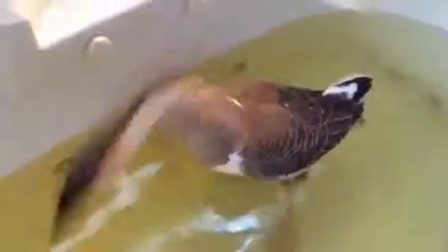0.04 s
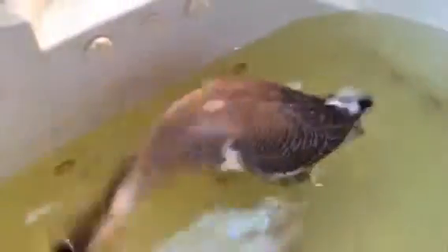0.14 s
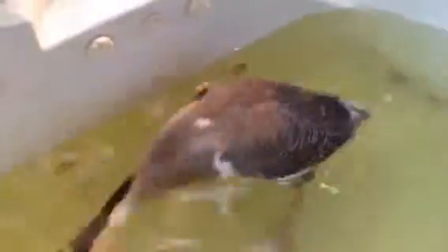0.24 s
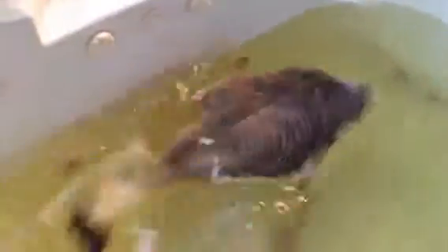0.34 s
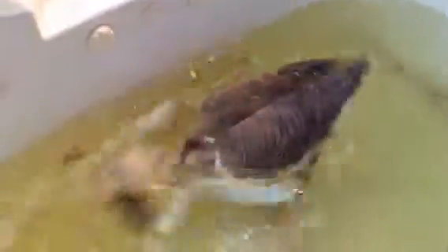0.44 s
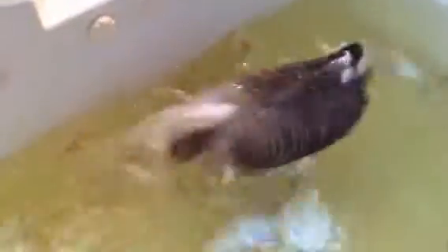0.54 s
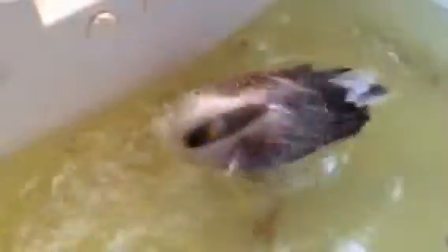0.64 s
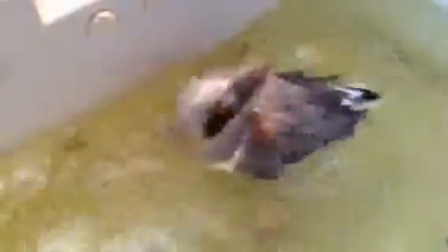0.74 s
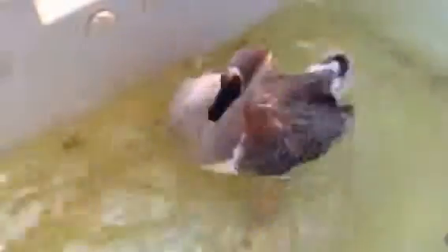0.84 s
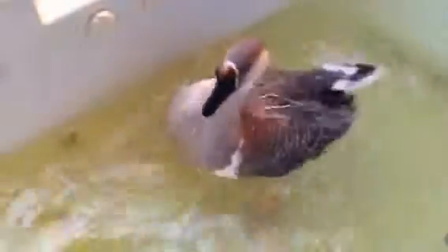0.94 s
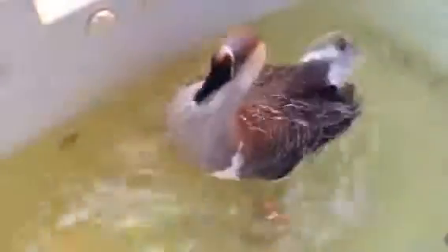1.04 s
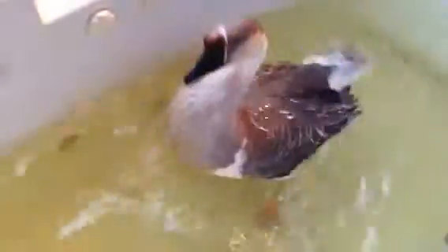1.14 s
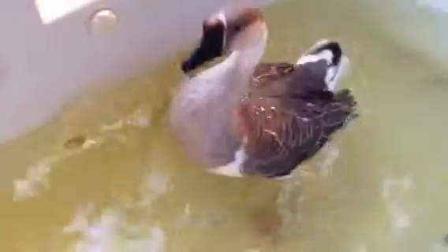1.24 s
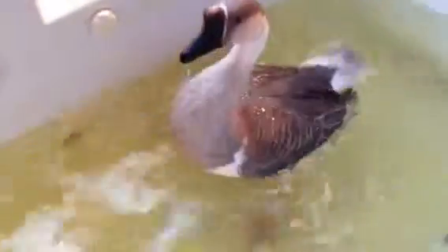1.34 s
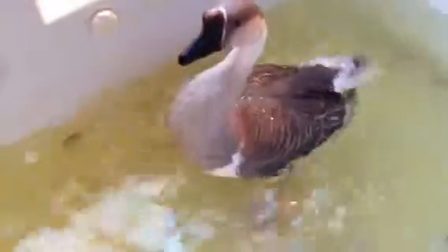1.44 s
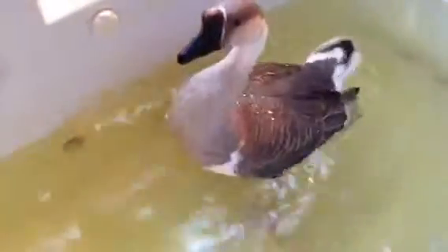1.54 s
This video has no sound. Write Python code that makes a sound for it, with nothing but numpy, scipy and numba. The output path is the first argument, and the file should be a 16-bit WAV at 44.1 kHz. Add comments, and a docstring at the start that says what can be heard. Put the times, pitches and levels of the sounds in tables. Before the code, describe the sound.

A bathing goose splashes water in a tub, with bubbly plops and light dripping afterwards.

```python
"""A sharp splash and a deep plop: a goose ducks its head in a bathtub, throws water over its back
and comes up dripping. Each splash is a cloud of ringing air bubbles, with deep churning below and
fine spray above. Sheets of water slap, big single bubbles plop, drops fall back and the feathers
trickle. The tub hums at its hollow note and the bathroom rings with it all, over a faint hush."""
import sys
import numpy as np
from scipy import signal
from scipy.fft import rfft, irfft, next_fast_len
from scipy.io import wavfile
from numba import njit

SR = 44100
rng = np.random.default_rng(int(sys.argv[2]) if len(sys.argv) > 2 else 0)


def transcribe(u):
    """Save the signal u as a 16-bit wav file named by the first command-line argument.

    u: samples, shape (n,) or (channels, n), limited to [-1, 1]; the rate is SR.
    q: integer samples, one column per channel.
    """
    v = np.clip(np.atleast_2d(u).T, -1, 1)
    q = np.round(v * 32767).astype(np.int16)
    wavfile.write(sys.argv[1], SR, q)


N = 70560

# splashes: peak t/s, rise/s, fall/s, froth f/Hz, churn level/dB, froth level/dB, spray level/dB
SPLASHES = [ (0.1908, 0.0029, 0.0077, 2096, -38.5, -35, -47), (.228, 0.012, 0.056, 1670, -49, -47, -56),
            (0.261, 0.00077, 0.011, 2550, -41, -47.5, -50), (0.301, 0.00093, 0.016, 4900, -82, -43.5, -48),
            (.368, 0.011, .015, 2380, -98, -44.5, -48.5), (0.39, 0.0068, 0.036, 2954, -52, -36, -43),
            (.450, 0.016, 0.013, 1618, -58, -37, -67), (0.5, 0.01, 0.019, 2380, -55, -35.5, -47.5),
            (.541, 0.01, 0.023, 2380, -41, -30.5, -42), (.568, .012, .040, 2006, -37, -31, -43.5),
            (.621, .011, .014, 2785, -37.5, -27, -38), (.665, 0.02, 0.086, 2046, -50.5, -33, -45),
            (0.774, .025, 0.054, 2258, -51.5, -34.5, -44), (.789, 0.0051, 0.01, 975, -52, -41, -60),
            (.815, 0.0055, 0.085, 2874, -63, -39, -46), (0.898, 0.016, 0.019, 2770, -52.5, -37.5, -56),
            (.955, .016, 0.026, 2044, -63, -37.5, -52), (1.012, .010, 0.034, 2430, -64, -49, -46),
            (1.155, 0.025, 0.027, 4030, -64, -66, -54.5), ]
# slaps of water: t/s, centre f/Hz, burst level/dB, resonance Q
SLAPS = [ (.1865, 11100, -33.5, 1.7), (.260, 10000, -32, 1.4), (0.2966, 4850, -20.5, 2.8),
         (.5635, 4330, -20, 3), (.589, 12500, -19.5, 2.8), (0.606, 8850, -19.5, 1.6),
         (.6235, 8600, -15.5, 1.9), (.802, 4750, -31, 4.6), (0.8055, 12500, -23.5, 4.7),
         (0.85, 8260, -19.5, 7), ]
# big single bubbles: t/s, f/Hz, level/dB, decay/s, glide/(octaves per s)
PLOPS = [ (.2055, 495, -19, 0.0035, -13), (.1905, 1140, -28, 0.0033, 1.5), (.2062, 908, -25, 0.0031, -5),
         (.2910, 3200, -35, 0.0016, 19), (.380, 524, -37.5, 0.02, 3), (.380, 1150, -39, 0.022, 2),
         (.3885, 3200, -20, 0.00093, 11), (.3890, 3840, -21, 0.0014, 24), (.428, 664.5, -39, 0.029, 7),
         (.477, 960, -31, 0.0082, 23), (.533, 3180, -26.5, 0.0041, 2.5), (.536, 1972, -28, 0.0096, 8),
         (.551, 2550, -27, 0.011, 4.5), (.603, 950, -13.5, 0.0022, 32), (.6115, 3530, -17.5, 0.00095, 4),
         (.676, 1525, -22, 0.0041, 11.5), (.755, 1500, -26.5, 0.0049, 1.5), (.782, 608, -29, 0.0064, 6),
         (.783, 1503, -28.5, 0.0056, 2), (.786, 2670, -26.5, 0.0035, 9.5), (.792, 737, -26, 0.011, 5.5),
         (.796, 1426, -20, 0.0031, 1), (.785, 928, -27, 0.0083, 4), (.818, 3320, -26.5, 0.0014, 24),
         (.835, 1317, -30, 0.0069, 22), (.848, 780, -32.5, 0.0064, 7), (.878, 850, -31.5, 0.0043, 7),
         (.912, 873, -44, 0.054, .5), (.9335, 1257, -22.5, 0.0082, 3), (.935, 2536, -34.5, 0.0034, 7.5),
         (.947, 1420, -39, 0.0038, 9), (1.003, 1853, -34, 0.016, 1), (1.005, 996, -28, 0.0061, -2),
         (1.018, 922, -36, 0.01, 3.5), (1.075, 2415, -46.5, 0.021, 3.5), (1.186, 2100, -43.5, 0.012, 5.5),
         (1.2045, 2920, -39.5, 0.0025, 1), (1.301, 4920, -48, 0.0016, -3.5), (1.375, 2390, -58, 0.0048, 22),
         (1.389, 2830, -53, .003, 20), (1.4494, 4910, -30, 0.0012, 10), (1.538, 2820, -52.5, 0.0069, 4), ]
# drops that trap a bubble: t/s, bubble f/Hz, bubble level/dB, decay/s, impact level/dB
DROPS = [ (1.1465, 2210, -45.5, 0.0045, -50), (1.1775, 2058, -30, 0.0067, -22),
         (1.2045, 2270, -40, 0.0047, -24), (1.241, 1960, -44, 0.0027, -35.5),
         (1.4917, 1560, -38, 0.01, -29), (1.522, 3300, -44.5, 0.0025, -43), ]
# first echoes off the tub walls: typical delay/s, gain
WALL_ECHOES = [(.0016, 0.19), (.0037, 0.24), (.0062, 0.1)]
# tone of the bathroom's tail: f/Hz, level/dB
ROOM_EQ = [(80, -9), (270, -7.5), (600, -10.5), (1500, -6), (3000, -9.5), (5000, -6.5), (7500, -3),
           (15000, -9.5)]
# tone of the steady hush: f/Hz, relative level/dB
HUSH_EQ = [(18, -94), (30, -47), (119, -7), (228, -3.5), (260, -5.5), (296, -3.5), (837, -16.5),
           (978, -16.5), (1140, -9.5), (1520, -15), (15000, -17)]
# microphone colour: f/Hz, level/dB
MIC_EQ = [(40, -25), (110, 0.5), (300, -4), (1000, -3), (3000, 1.5), (6000, 0), (10000, -3.5),
          (14000, -3.5)]

# grain textures: rate/(grains per s), pitch spread/octaves, decay/cycles, level scatter/dB
CHURN = (1300, 0.519, 2.24, 2.2)
FROTH = (3900, 0.7215, 3.45, 5.6)
SPRAY = (5000, 0.73, 2, 5.3)
TRICKLE = (600, 0.528, 9.3, 6.6)
TICKS = (140, 0.32, 0.83, 2.2)

SPOTS = 6  # places on the water, each with its own echoes
CHURN_HZ, SPRAY_HZ, GRAIN_GLIDE_OCT = 479, 7760, 0.046  # glide per decay time
IMPACT_HZ, IMPACT_DECAY_S, IMPACT_ATTACK_S, IMPACT_LOW_CUT_HZ = 2920, 0.00035, 0.000092, 1580
ROOM_T60_S, TREBLE_T60_S, CROSSOVER_HZ, BUILD_S = .37, .28, 3700, 0.003
WASH_DB, WASH_T60_S, WALL_SPREAD_OCT = -6.5, 0.064, 0.36


def splashes():
    """Every splash churns big air pockets, froths with bubbles and scatters spray."""
    out = np.zeros((SPOTS, N))
    for peak, rise, fall, froth_hz, churn_db, froth_db, spray_db in SPLASHES:
        out += bubble_cloud(peak, rise, fall, CHURN_HZ, churn_db, CHURN)
        out += bubble_cloud(peak, rise, fall, froth_hz, froth_db, FROTH)
        out += bubble_cloud(peak, rise, fall, SPRAY_HZ, spray_db, SPRAY)
    return out


def bubble_cloud(peak, rise, fall, centre_hz, db, texture, max_grains=1800):
    """Bubble grains of many sizes, louder towards the peak time and fading after it."""
    rate, spread, cycles, scatter_db = texture
    lead = 2.5 * rise
    span = lead + 4.5 * fall
    count = int(np.clip(rate * span, 8, max_grains))
    jitter = rng.random(max_grains)[:count]
    t = (np.arange(count) + jitter) / count * span - lead
    pitch, strength = np.clip(rng.standard_normal((max_grains, 2))[:count], -2.4, 2.4).T
    hz = np.minimum(centre_hz * 2 ** (spread * pitch), SR * .42)
    decay = cycles / hz * 2 ** rng.uniform(-1, 1, max_grains)[:count]
    swell = np.where(t < 0, np.exp(-.5 * (t / rise) ** 2), np.exp(-np.abs(t) / fall))
    gain = swell * undb(scatter_db * strength) / np.sqrt(decay)
    grains = ring(peak + t, hz, gain, decay, GRAIN_GLIDE_OCT / decay, .5 / hz)
    return grains * undb(db) * np.sqrt((rise + fall / 2) * SR / np.sum(grains ** 2))


@njit
def ring(start, hz, gain, decay, glide, attack):
    """Trapped air rings: sines that swell, glide and die away, dealt out over the spots."""
    out = np.zeros((SPOTS, N))
    for k in range(len(start)):
        first = int(start[k] * SR) + 1
        for i in range(max(first, 0), min(N, first + int(7 * decay[k] * SR))):
            t = i / SR - start[k]
            phase = 2 * np.pi * hz[k] * t * (1 + np.log(2) * glide[k] * t / 2)
            envelope = np.exp(-t / decay[k]) * (1 - np.exp(-t / attack[k]))
            out[k % SPOTS, i] += gain[k] * envelope * np.sin(phase)
    return out


def slaps(decay_s=0.0014):
    """Sheets of water crack on the surface: snaps of noise through a bright resonance."""
    t = np.arange(N) / SR
    out = np.zeros((SPOTS, N))
    for k, (start, hz, db, q) in enumerate(SLAPS):
        burst = rng.standard_normal(N) * (t >= start) * np.exp(-np.abs(t - start) / decay_s)
        out[k % SPOTS] += undb(db) * signal.lfilter(*signal.iirpeak(hz, q, fs=SR), burst)
    return out


def plops(attack_share=0.28):
    """Single bubbles plop and plink above the splashing; the longer the ring, the softer the attack."""
    start, hz, db, decay, glide = columns(PLOPS)
    return ring(start, hz, undb(db) * (1 + attack_share), decay, glide, attack_share * decay)


def drops(attack_s=0.00091, glide_oct_per_s=1.2):
    """Water drips off the goose: a tick on the surface, then the trapped bubble rings."""
    start, hz, db, decay, impact_db = columns(DROPS)
    each = np.ones(len(start))
    tick = ring(start, IMPACT_HZ * each, undb(impact_db), IMPACT_DECAY_S * each,
                0 * each, IMPACT_ATTACK_S * each)
    bubble = ring(start, hz, undb(db), decay, glide_oct_per_s * each, attack_s * each)
    return pass_filter(tick, "high", IMPACT_LOW_CUT_HZ) + bubble


def runoff():
    """Water runs off the feathers in tiny bubbles and lone ticks."""
    trickle = bubble_cloud(peak=1.22, rise=0.57, fall=0.33, centre_hz=3001, db=-64, texture=TRICKLE)
    # the negative rise holds the ticks back until 1.35 s
    ticks = bubble_cloud(peak=.95, rise=-0.16, fall=0.54, centre_hz=8495, db=-65.5, texture=TICKS)
    return trickle + ticks


def tub(water, hz=266.5, q=27, gain=1.84):
    """The tub hums along at its hollow note."""
    return water + gain * signal.lfilter(*signal.iirpeak(hz, q, fs=SR), water)


def bathroom(spot):
    """Wall echoes and a short dense wash in the tub, then a room tail whose treble dies sooner."""
    t = np.arange(N) / SR
    noise = rng.standard_normal((3, N))
    fade = lambda t60: np.exp(-np.log(1000) * t / t60) * (1 - np.exp(-(t / BUILD_S) ** 2))
    unit_energy = lambda x: x / np.sqrt(np.sum(x ** 2))
    body = pass_filter(noise[0], "low", CROSSOVER_HZ) * fade(ROOM_T60_S)
    treble = pass_filter(noise[1], "high", CROSSOVER_HZ) * fade(TREBLE_T60_S)
    wash = undb(WASH_DB) * unit_energy(noise[2] * fade(WASH_T60_S))
    response = equalise(unit_energy(body + treble), ROOM_EQ) + wash
    for delay, gain in WALL_ECHOES:
        stretch = 2 ** (WALL_SPREAD_OCT * rng.uniform(-1, 1))  # wall distance differs by spot
        response[int(delay * stretch * SR)] += gain
    return spot + signal.fftconvolve(spot, response)[:N]


def hush(db=-65.5):
    """Faint, steady room tone."""
    noise = equalise(rng.standard_normal(N), HUSH_EQ)
    return noise * undb(db) / np.std(noise)


def equalise(x, points):
    """A minimum-phase EQ through (f/Hz, level/dB) points, so attacks stay sharp."""
    size = next_fast_len(2 * len(x))
    size += size % 2
    hz, db = columns(points)
    bin_hz = np.arange(size // 2 + 1) * SR / size
    curve_db = np.interp(np.log(bin_hz + 1), np.log(hz), db)
    cepstrum = irfft(np.log(undb(curve_db)))
    cepstrum[1:size // 2] *= 2
    cepstrum[size // 2 + 1:] = 0
    return irfft(rfft(x, size) * np.exp(rfft(cepstrum)))[:len(x)]


def pass_filter(x, kind, hz):
    """A gentle low-pass or high-pass."""
    return signal.sosfilt(signal.butter(2, hz, kind, fs=SR, output="sos"), x)


def undb(db):
    """Decibels to gain."""
    return 10 ** (np.asarray(db) / 20)


def columns(table):
    """One array per column."""
    return np.array(table, float).T.copy()


def scene():
    """The water in the bathroom, heard in mono from above the tub."""
    water = splashes() + slaps() + plops() + drops() + runoff()
    heard = sum(bathroom(spot) for spot in tub(water))
    return (equalise(heard, MIC_EQ) + hush())[None]


def record(dry, top_hz=15300):
    """A steep high cut takes off the very top."""
    return signal.sosfilt(signal.ellip(10, .2, 70, top_hz, fs=SR, output="sos"), dry)


dry = scene()
out = record(dry)
transcribe(out)
```